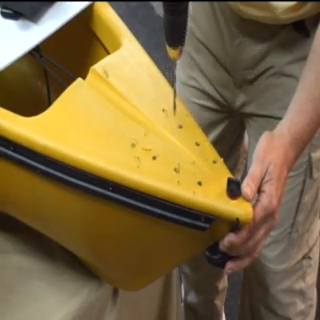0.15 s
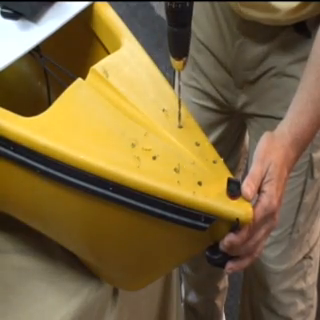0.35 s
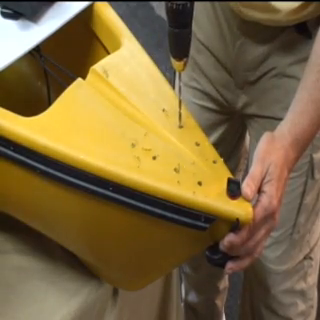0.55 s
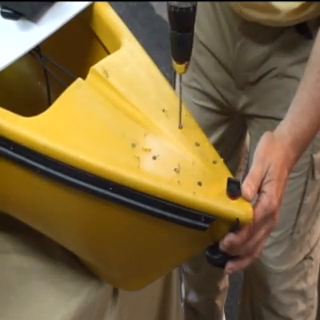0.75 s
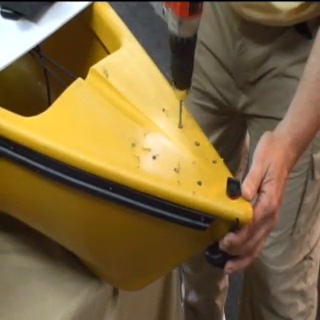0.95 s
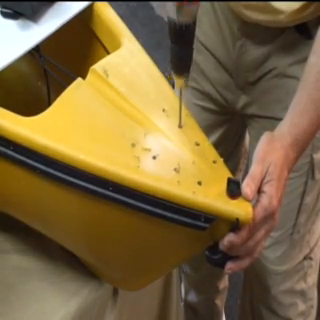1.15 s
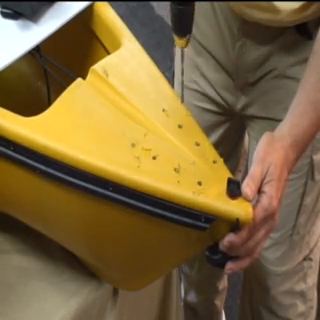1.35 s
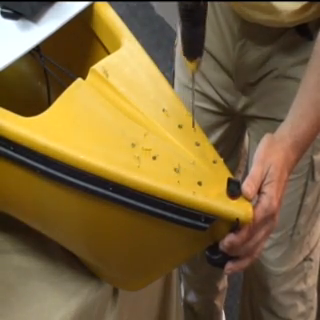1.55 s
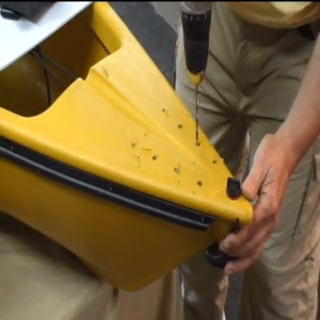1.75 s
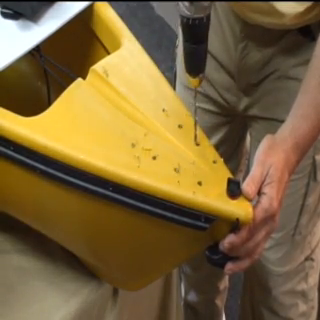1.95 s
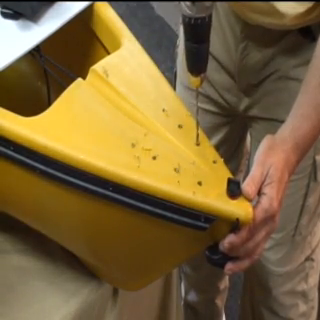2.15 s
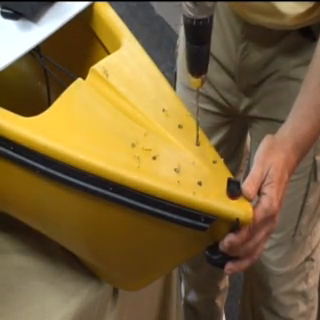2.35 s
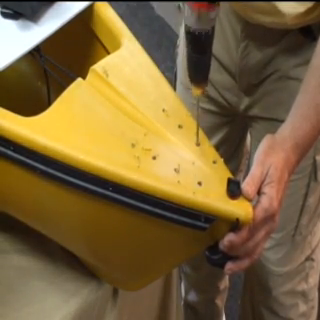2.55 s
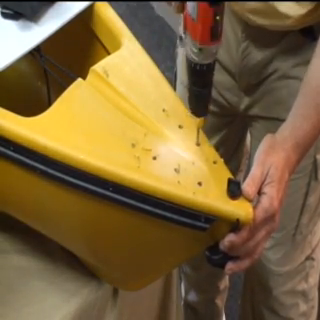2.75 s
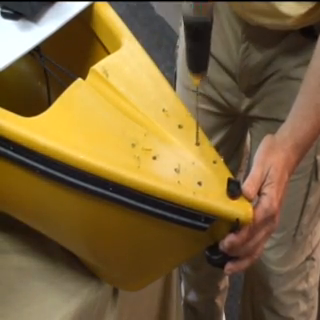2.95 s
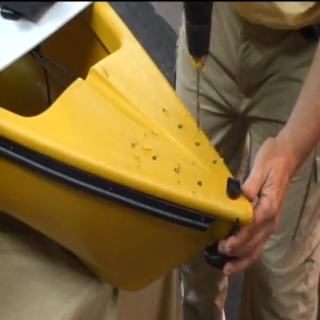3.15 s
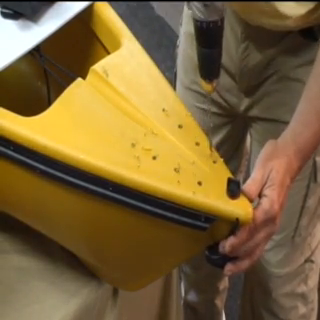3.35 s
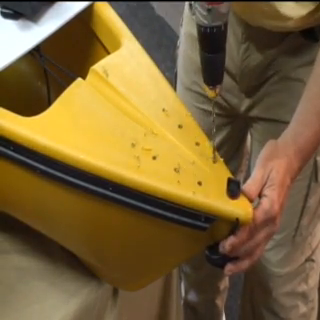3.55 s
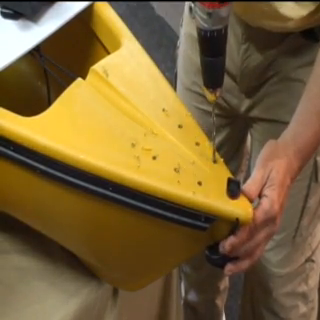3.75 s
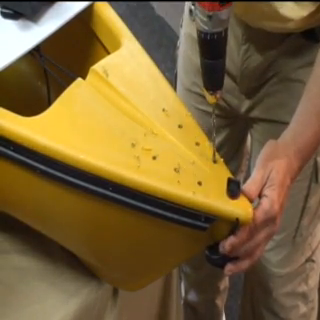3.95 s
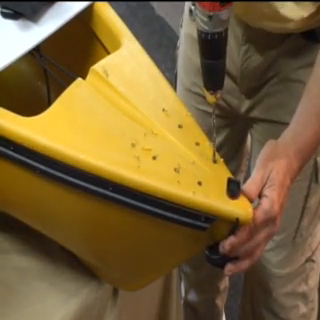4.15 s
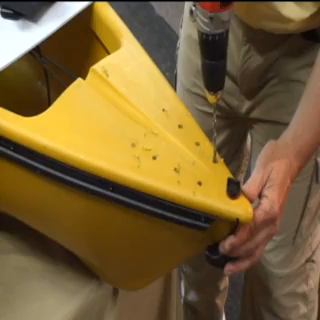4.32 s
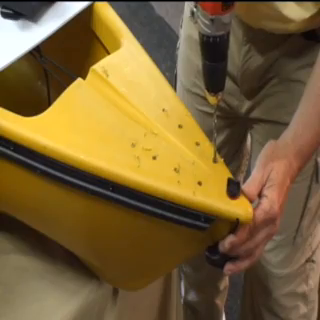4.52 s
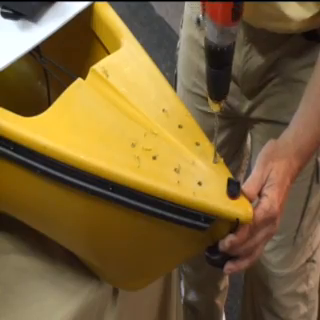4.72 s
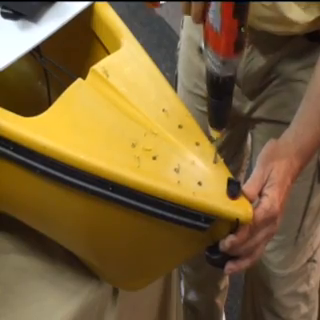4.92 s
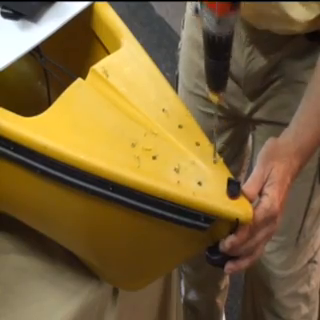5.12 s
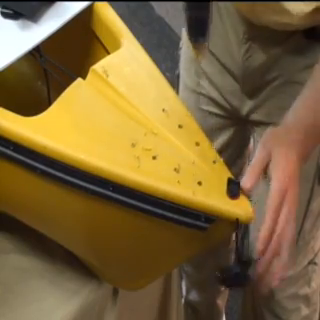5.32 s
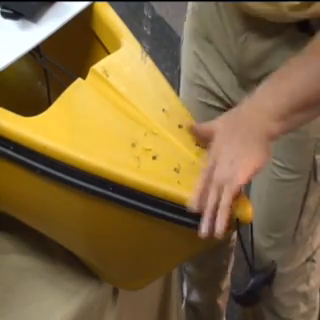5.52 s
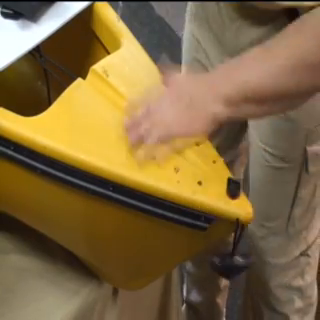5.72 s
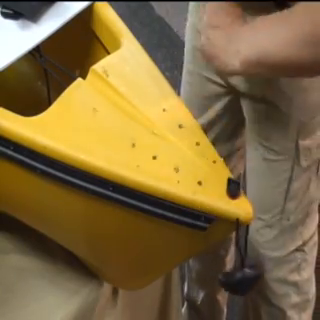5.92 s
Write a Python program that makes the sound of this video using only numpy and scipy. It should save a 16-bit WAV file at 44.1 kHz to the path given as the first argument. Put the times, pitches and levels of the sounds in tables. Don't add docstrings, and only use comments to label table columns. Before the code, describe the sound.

Close power drill in a humming workshop runs four times, braking abruptly with clattering clicks, before a palm begins brushing across plastic.

```python
import sys
import numpy as np
from scipy import signal
from scipy.fft import rfft, irfft
from scipy.io import wavfile
from scipy.ndimage import uniform_filter1d

SR = 44100
rng = np.random.default_rng(int(sys.argv[2]) if len(sys.argv) > 2 else 0)


def volts(x):
    e = np.asarray(x, float) / 20
    return 10 ** e


def to_wav(sig):
    pcm = np.clip(np.atleast_2d(sig), -1, 1) * 32767
    pcm = np.round(pcm).astype(np.int16)
    wavfile.write(sys.argv[1], SR, pcm.T)


N = 263718
T = np.arange(N) / SR
HZ = np.fft.rfftfreq(512, 1 / SR)

# [pulled_s, released_s, mesh_at_release_hz, rattle_db, whine_db]
RUNS = [
    (-.42, .257, 5735, -19.5, .5),
    (.994, 1.634, 5714, -19.3, -1.5),
    (2.687, 3.368, 5664, -19.5, .3),
    (4.886, 5.518, 5662, -18, -2.5),
]
LOCK_S = .014
# [pitch_hz, width_hz, level_db]
CASE = [(1000, 190, -6), (1400, 140, -9), (1800, 200, -13), (3120, 460, -14.5), (4030, 400, -8),
        (6210, 190, -15.5), (8600, 700, -6)]


def evened(x):
    return x / np.sqrt(np.mean(x ** 2) + 1e-20)


def read(points, hz):
    f, value = np.transpose(points)
    return np.interp(np.log(hz + 1), np.log(f + 1), value)


def track(tables, column, rest):
    out = np.full(N, float(rest))
    for rows in map(np.array, tables):
        inside = (T >= rows[0, 0]) & (T <= rows[-1, 0])
        out[inside] = np.interp(T[inside], rows[:, 0], rows[:, column])
    return out


def colour(x, gain):
    return signal.oaconvolve(x, np.roll(irfft(gain), 256) * np.hanning(512), "same")


def resonate(x, hz, width):
    return signal.lfilter(*signal.iirpeak(hz, hz / width, SR), x)


def drift(hz):
    return evened(signal.lfilter(*signal.butter(1, hz, fs=SR), rng.standard_normal(N)))


def motor():
    teeth, growl_level_db = 15, -22
    mesh_hz, whine_db, start_db = shaft()
    level_db, bright_db = rattle()
    load = uniform_filter1d(volts(level_db), 150)
    turns = np.cumsum(mesh_hz * (1 + .002 * drift(hz=38.3))) / SR / teeth

    flutter_db = 2 - 4.5 * np.minimum(abs(drift(hz=25)), 1.7) ** 1.5 / 2
    whine = np.sqrt(2) * volts(whine_db + flutter_db) * np.sin(2 * np.pi * teeth * turns)
    growl_swell = volts(growl_level_db + start_db) * (1 + 0.37 * drift(hz=100))
    growl = growl_swell * np.sin(2 * np.pi * teeth / 3 * turns)
    return whine + growl + shaft_orders(turns) * load * (mesh_hz / 5700) ** 2 + gear_noise(turns, load, bright_db)


def shaft_orders(turns):
    # [turns_multiple, level_db re rattle load]
    order_lines = [(1, -9.5), (3, -13.5), (3.35, -8.5), (6, -10.5), (8.8, -15), (9.35, -18), (10, -10),
                   (11, -13), (13, -10), (14, -17), (16, -24), (18, -20), (21, -11), (22, -14), (30, -7.5)]
    orders = np.zeros(N)
    for k, db in order_lines:
        orders += volts(db + 3.4 * drift(hz=44)) * np.sin(2 * np.pi * (k * turns + rng.random()))
    orders = orders + sum(volts(db + 3.5) * resonate(orders, hz, width) for hz, width, db in CASE)
    return volts(-7) * orders


def gear_noise(turns, load, bright_db):
    # [pitch_hz, density_db per Hz]
    housing_colour = [(180, -46), (300, 5), (336, -25), (376, -10), (487, -10), (1370, -3.5), (1660, -8.5),
                      (1800, -4.5), (2260, -5.5), (3330, -2), (5150, -6.5), (5490, -8), (5960, -5.5),
                      (11000, -12.5), (14200, -21.5)]
    knocks = (rng.random(N) < .15) * rng.standard_normal(N)
    beat = 1 + 0.067 * np.cos(2 * np.pi * turns) + 0.065 * np.cos(2 * np.pi * turns / 7)
    drive = beat * volts(0.4 * drift(hz=25.2)) * (rng.standard_normal(N) + 0.52 * evened(knocks))
    drive = drive + sum(volts(db) * resonate(drive, hz, width) for hz, width, db in CASE)
    drive = patchy(drive, depth_db=2.2)
    shape = volts(read(housing_colour, HZ))
    high = 1 / (1 + (5500 / (HZ + 1)) ** 6)
    body = evened(colour(drive, shape * (1 - high))) * load
    sizzle = evened(colour(drive, shape * high)) * load * volts(bright_db)
    return volts(2.47) * body + volts(1.24) * sizzle


def shaft():
    # [pitch_hz, level_db]
    mesh_gain = [(1700, -60), (3100, -45), (4050, -32), (4500, -18.5), (4950, -27), (5250, -22),
                 (5500, -24), (5680, -20.5)]
    run_creeps = [180, 140, -20, 10]
    run_growls = [0, 0.5, -3, -1.5]
    rotor_hz, rotor_s = 1800, .033
    chuck_hz, chuck_s = 3000, .095
    spin_up_s, brake_s, brake_drop, brake_db = .072, .026, .42, -20.5
    let_go_s = .006
    bump = [(1, -30), (.75, -9), (.42, 0), (.28, -20)]

    mesh_hz, whine_db, starts = np.zeros(N), np.full(N, -120.), []
    for (on, off, top_hz, _, db), creep, growl_db in zip(RUNS, run_creeps, run_growls):
        inside = (T >= on) & (T <= off + brake_s)
        age = T[inside] - on
        brake = np.maximum(T[inside] - off + let_go_s, 0) / (let_go_s + brake_s)
        missing_hz = rotor_hz * np.exp(-age / rotor_s) + chuck_hz * np.exp(-age / chuck_s)
        hz = top_hz - creep * (off - on - age) - missing_hz
        mesh_hz[inside] = hz * (1 - brake_drop * brake ** 1.6)
        whine_db[inside] = np.where(age > off - on, brake_db, db + read(mesh_gain, np.maximum(hz, 1)))
        starts.append([(on + (1 - left) * spin_up_s, db + growl_db) for left, db in
                       [(left, db + bump_db) for left, bump_db in bump]])
    return mesh_hz, whine_db, track(starts, 1, -120)


def rattle():
    # [after_s, level_db]
    pull_rise = [(-.02, -38), (0, -19), (.018, -11), (.045, -5.5), (.08, -4), (.105, -1.5), (.16, 0)]
    run_brights = [-3.7, -3.5, -2.5, -2.5]
    # [start_s, level_db, hold_s, fall_db_per_s]
    run_downs = [
        (.272, -14.5, .001, 186),
        (1.648, -15.5, .001, 195),
        (3.374, -18.5, .001, 165),
        (3.45, -27.5, .015, 175),
        (5.526, -18, .07, 240),
    ]
    dull_db, dull_s, coast_bright_db = -7, .08, -2
    tail_db, tail_db_per_s = -10.5, 120
    level_db, bright_db = np.full(N, -120.), np.full(N, float(coast_bright_db))
    for (on, off, _, db, _), top_db in zip(RUNS, run_brights):
        inside = (T >= on + pull_rise[0][0]) & (T < off + LOCK_S)
        age = T[inside] - on
        level_db[inside] = db + np.interp(age, *np.transpose(pull_rise))
        bright_db[inside] = top_db + dull_db * np.exp(-abs(age) / dull_s)
    for s, db, hold, fall in run_downs:
        age = T[T >= s] - s
        down_db = db + np.maximum(-fall * np.maximum(age - hold, 0), tail_db - tail_db_per_s * age)
        level_db[T >= s] = np.maximum(level_db[T >= s], down_db)
    return level_db, bright_db


def patchy(x, depth_db):
    z = signal.stft(x, nperseg=1024)[2]
    field = uniform_filter1d(uniform_filter1d(rng.standard_normal(z.shape), 3, 0), 4, 1)
    return signal.istft(z * volts(depth_db * evened(field)), nperseg=1024)[1][:N]


def trigger():
    # [pitch_hz, level_db, length_s]
    squeak = (5800, -34.5, 0.021)
    hz, db, seconds = squeak
    gate = [[(on - .022, db - 20), (on - .006, db), (on - .006 + seconds, db - 28)] for on, *_ in RUNS]
    return evened(resonate(rng.standard_normal(N), hz, 150)) * volts(track(gate, 1, -120))


def hull():
    # [pitch_hz, width_hz, level_db]
    shell_modes = [(179, 29, 1.5), (260, 54, 3.5)]
    shake = rng.standard_normal(N)
    boom = sum(volts(db) * resonate(resonate(shake, hz, width), hz, 2 * width) for hz, width, db in shell_modes)
    return evened(boom) * bites() * volts(-5.5)


def bites():
    # [peak_s, level_db, rise_s per 20 dB, fall_s per 20 dB]
    bite_peaks = [
        (.2, -14.5, .7, .04),
        (1.183, -18, .02, .05),
        (1.46, -25, .9, .1),
        (1.531, -15, .12, .06),
        (2.907, -26, .15, .02),
        (2.985, -23, .05, .1),
        (3.225, -21.5, .23, .05),
        (5.142, -22, .11, .1),
        (5.2, -28, .1, 1.2),
    ]
    idle_boom_db = -41
    peaks = [db - 20 * np.maximum((s - T) / rise, (T - s) / fall) for s, db, rise, fall in bite_peaks]
    turning = sum((T >= on) & (T < off + LOCK_S) for on, off, *_ in RUNS)
    return volts(np.maximum(np.max(peaks, axis=0), idle_boom_db)) * uniform_filter1d(1. * turning, size=400)


def clacks():
    # [pitch_hz, width_hz, level_db]
    knock_modes = [(1000, 420, -4), (1980, 1300, -2), (3080, 1200, 1), (3900, 1400, -29.5),
                   (6800, 3000, -14.5)]
    snap_modes = [(8100, 610, -16), (10000, 360, 5), (11800, 4000, -13), (14000, 2200, -4)]
    # [start_s, peak_db, high_part_db]
    lock_blows = [(.277, 4, -15), (.2935, .5, 1), (.311, -1.5, 1), (1.654, 5.5, -6), (1.671, 6, -9),
                  (1.691, -.5, -3), (3.376, 3.5, -28), (3.382, 8.5, -11), (3.399, 7, -11), (5.53, 4, -21),
                  (5.536, 5, -5), (5.559, 6, -14), (5.573, 6, -10), (5.592, 3, -1.5)]
    # [start_s, peak_db, high_part_db, length_ms]
    small_ticks = [(.348, -17, 3, 2.8), (.45, -30, -1.5, 1.5), (.475, -26, -10, 1.6), (.994, -16, -17, 2.5),
                   (1.735, -16, -11, 2.5), (2.349, -44, 7, 4), (2.684, -33, -12, 2.8),
                   (3.422, -12, -2, 2.5), (3.454, -18, 11, 16), (3.458, -8, 5, 3), (3.473, -15, 7, 6.4),
                   (3.492, -27, -9, 2.1), (3.609, -33, -8, 1.9), (4.626, -38, -3, 3),
                   (4.888, -19, -11, 2.8), (5.62, -11, -1.5, 1.7), (5.743, -43, 8, 2.1),
                   (5.81, -42, -8, 1.4), (5.829, -33, -5, 2.1), (5.865, -25, -8, 2.2),
                   (5.893, -31, -8, 2.3)]
    lock_ms = 2.3

    def struck(touches, modes):
        rung = sum(volts(db) * resonate(touches, hz * rng.uniform(0.88, 1.04), width) for hz, width, db in modes)
        return rung / abs(rung).max()

    out, t = np.zeros(N + SR), np.arange(3000) / SR
    for s, peak_db, high_db, ms in [(*row, lock_ms) for row in lock_blows] + [tuple(row) for row in small_ticks]:
        u = 1000 * t / max(ms, .5)
        contacts = rng.standard_normal(len(t)) * rng.random(len(t)) ** 2
        touches = contacts * (1 - np.exp(-u * 4.6)) * np.exp(-u)
        blow = struck(touches, knock_modes) + volts(high_db) * struck(touches, snap_modes)
        at = round(s * SR)
        out[at:at + len(blow)] += volts(peak_db) * blow
    return out[:N]


def thud():
    # [start_s, level_db, pitch_hz, width_hz, length_ms]
    chuck_bump = (3.416, -23, 800, 170, 10)
    s, db, hz, width, ms = chuck_bump
    u = np.maximum(T - s, 0) * 1000 / ms
    return volts(db) * np.e * u * np.exp(-u) * evened(resonate(rng.standard_normal(N), hz, width))


def bit():
    # [pitch_hz, wander_hz]
    bending_modes = [(3948, 1), (8575, 28.5), (11260, 35)]
    out = np.zeros(N)
    for k, (hz, wander_hz) in enumerate(bending_modes):
        phase = 2 * np.pi * np.cumsum(hz + wander_hz * drift(hz=30)) / SR
        flutter_db = 0.21 * wander_hz * drift(hz=50)
        out += np.sqrt(2) * volts(ringing(k) + flutter_db) * np.sin(phase)
    return out


def ringing(k):
    # [start_s, first_mode_db, second_mode_db, first_fall_db_per_s, first_choked_after_s]
    strikes = [
        (.365, -43.5, -42, 36, .29),
        (1.745, -41, -46, 55, .245),
        (3.491, -33.5, -45, 68, .44),
        (5.655, -51.5, -47, 35, .2),
        (5.79, -58, -51, 11, .4),
        (5.885, -59, -48, 11, .4),
    ]
    upper_falls = [40, 200]
    third_db, upper_s, choke_db = -5, .165, 25
    out_db = np.full(N, -120.)
    for s, first_db, second_db, first_fall, first_s in strikes:
        after = (T >= s) & (T < s + 2 * first_s)
        age = T[after] - s
        db = [first_db, second_db, first_db + third_db][k]
        fall, lasts = (upper_falls[k - 1], upper_s) if k else (first_fall, first_s)
        out_db[after] = np.maximum(out_db[after], db - fall * age - choke_db * (age / lasts) ** 8)
    return out_db


def brush():
    # [time_s, level_db]
    stroke = [
        (5.68, -53),
        (5.8, -46),
        (5.85, -41.5),
        (5.98, -33.5),
    ]
    # [pitch_hz, density_db per Hz]
    palm_colour = [(350, -28), (600, -2), (948, -18), (1350, -10.5), (7860, -13), (8750, -11), (13300, -17),
                   (15000, -57)]
    chips = volts(3 * rng.exponential(1, N)) * (rng.random(N) < 600 / SR)
    rub = rng.standard_normal(N) * volts(2. * drift(hz=29.5)) + .5 * evened(chips)
    return evened(colour(rub, volts(read(palm_colour, HZ)))) * volts(track([stroke], 1, -120))


def walls(x):
    # [pitch_hz, t60_s]
    wall_decay = [(300, 0.22), (2000, 0.27), (10000, 0.19)]
    size = SR // 2
    taps = rng.choice([-1., 1.], (2, size)) * (rng.random((2, size)) < .05)
    taps = taps * (np.arange(size) > 250)
    hz, t, z = signal.stft(taps, SR, nperseg=256)
    tail = signal.istft(z * volts(-60 * t / read(wall_decay, hz)[:, None]), SR, nperseg=256)[1]
    return signal.fftconvolve(x[None], tail / np.linalg.norm(tail[0]), axes=1)[:, :N]


def shop():
    # [pitch_hz, density_db per Hz]
    air_colour = [(15, -45), (25, -29.5), (86, -10.5), (123, -2.5), (320, -11), (414, -11.5), (496, -16.5),
                  (536, -14), (875, -18.5), (945, -20.5), (1290, -22.5), (1890, -28.5), (8020, -42.5),
                  (10900, -39.5), (11800, -47), (15300, -79), (22000, -120)]
    # [pitch_hz, likeness]
    air_same = [(60, .997), (180, .99), (540, .89), (1630, .66), (4890, .5), (14700, .62)]
    # [pitch_hz, level_db]
    hum_lines = [(118.4, -45), (430.7, -62), (597.5, -55.5), (893.6, -56.5), (3951, -80.5), (5545, -74),
                 (5696, -79), (6584, -71), (7079, -73), (8436, -74), (9895, -115), (10492, -77),
                 (10724, -71), (10788, -71.5)]
    air_db = -36
    frames, hz = N // 512 + 5, np.fft.rfftfreq(2048, 1 / SR)
    a, b, c, d, patches = rng.standard_normal((frames, len(hz), 5)).T
    patches = evened(uniform_filter1d(uniform_filter1d(patches, 12, 0), 6, 1))
    same = np.clip(read(air_same, hz), -1, 1)[:, None]
    left = a + 1j * b
    right = same * left + np.sqrt(1 - same ** 2) * (c + 1j * d)
    z = np.array([left, right]) * volts(read(air_colour, hz)[:, None] + 1.83 * patches)
    air = volts(air_db) * evened(signal.istft(z, nperseg=2048, noverlap=1536)[1][:, :N])
    tones = np.zeros(N)
    for f, db in hum_lines:
        tones += volts(db + 3 + 2. * drift(hz=2.3)) * np.sin(2 * np.pi * f * T + 0.55 * drift(hz=3.6))
    return air + tones


def draught():
    # [pitch_hz, density_db per Hz]
    gust_colour = [(20, -6), (40, 1.5), (70, 12), (110, -32.5)]
    lumps = irfft(rfft(rng.standard_normal(N)) * volts(read(gust_colour, np.fft.rfftfreq(N, 1 / SR))), N)
    return volts(-52.5) * evened(lumps * volts(6 * np.tanh(drift(hz=4)) * 2.3))


def scene():
    # [pitch_hz, likeness]
    near_same = [(60, 0.99), (150, 0.92), (380, 0.92), (940, 0.97), (2350, 0.87), (5880, 0.85),
                 (14700, 0.94)]
    # [pitch_hz, left_minus_right_db]
    near_lean = [(60, 0), (400, -.1), (940, -.2), (2350, -1.4), (5880, -3), (10000, -1.5), (14700, -.3)]
    near = motor() + trigger() + clacks() + brush() + thud()
    same = np.clip(read(near_same, HZ), 0, .999)
    lean_db = read(near_lean, HZ)
    direct = np.array([colour(near, np.sqrt(same) * volts(side * lean_db / 2)) for side in (1, -1)])
    room = volts(-1.5) * walls(colour(near, np.sqrt(1 - same)))
    return direct + room + hull() + bit() * volts([[-.6], [.6]]) + shop() + draught()


def treble_gate(x):
    # [pitch_hz, level_db a bin]
    hearing_limit = [(11500, -108), (12300, -96), (14300, -66), (15300, -17)]
    hz, _, z = signal.stft(x, SR, nperseg=2048)
    level_db = 10 * np.log10(uniform_filter1d((abs(z) ** 2).mean(0), 16, 0) + 1e-20)
    heard = (level_db > read(hearing_limit, hz)[:, None]) | (hz[:, None] < hearing_limit[0][0])
    keep = np.maximum.accumulate(heard[::-1], 0)[::-1]
    return signal.istft(z * keep, SR, nperseg=2048)[1][:, :N]


def top_cut(x):
    return signal.sosfilt(signal.butter(12, 15310, fs=SR, output="sos"), x)


def record(dry):
    power_db = 10 * np.log10(uniform_filter1d((dry ** 2).mean(0), 100) + 1e-9)
    quick, slow = T * 69.0, T * 12.0
    dip_db = np.maximum(np.maximum.accumulate(power_db + quick) - quick + 10, 0)
    creep_db = np.maximum(np.maximum.accumulate(power_db + slow) - slow + 15.5, 0)
    gain_cut_db = uniform_filter1d(.85 * dip_db + 0.28 * creep_db, 200)
    late_db = np.roll(gain_cut_db, 100)
    mix = treble_gate(0.87 * np.tanh(dry * volts(-late_db) / .9))
    return top_cut(mix)


dry = scene()
out = record(dry)
to_wav(out)
```